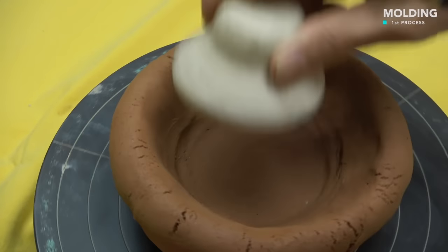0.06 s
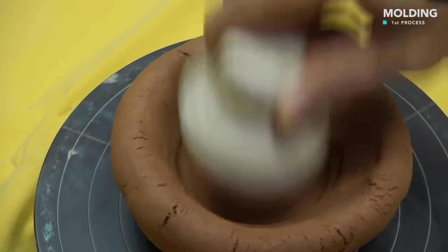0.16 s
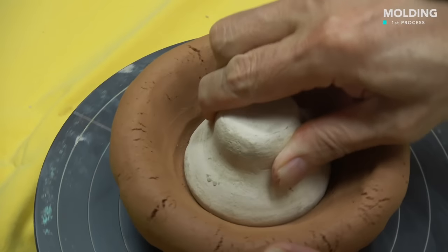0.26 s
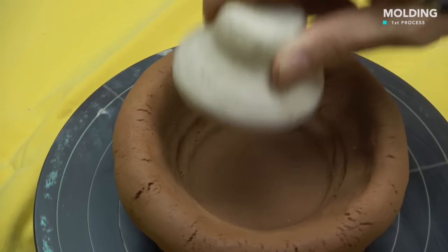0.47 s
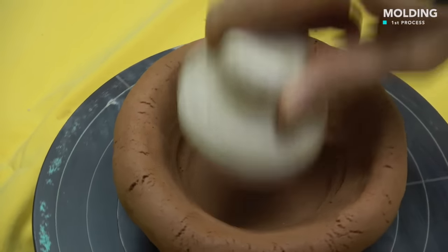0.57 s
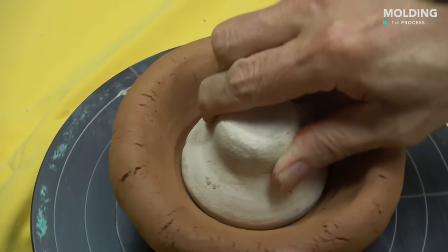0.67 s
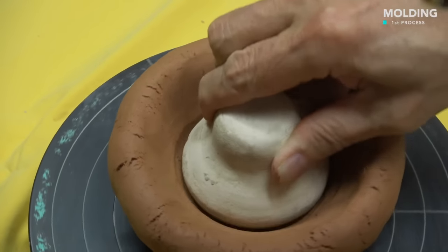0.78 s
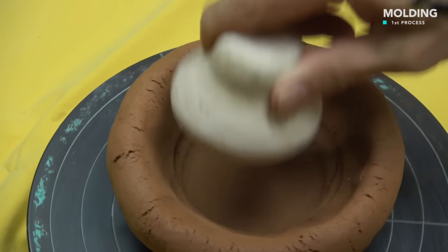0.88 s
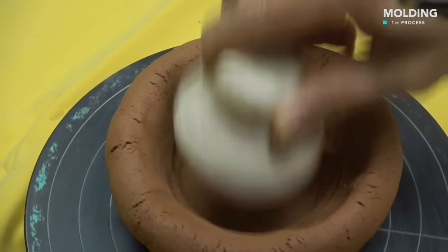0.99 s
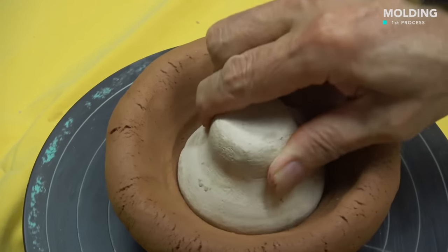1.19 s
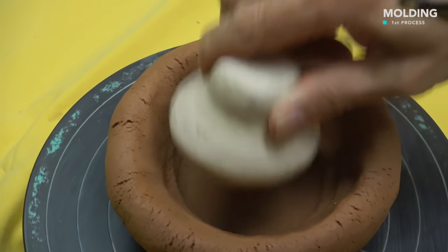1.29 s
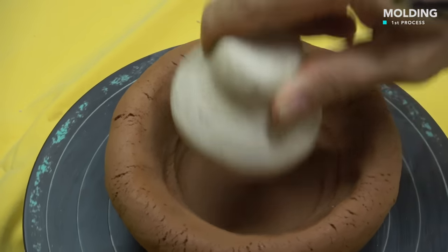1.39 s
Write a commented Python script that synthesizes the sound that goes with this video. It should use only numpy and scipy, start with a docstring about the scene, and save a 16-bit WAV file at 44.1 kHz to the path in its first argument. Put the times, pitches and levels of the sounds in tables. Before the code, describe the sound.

Three short, dull taps of a rounded plaster tool pressing into a soft clay bowl, evenly spaced, with faint sticky ticks as it lifts between them; close microphone, small hard-walled workshop, low quiet room hum.

```python
"""Tapping a soft clay bowl

A rounded plaster tool is tapped into a soft clay bowl on a turntable in a hard-walled workshop.
Each tap is a puff of noise before contact, a slap of noisy contacts and impulses ringing broad resonances.
The tool ticks faintly as it unsticks: short bursts of bright noise. One near echo is a delayed copy;
the room answers with decaying noise bands and low sine modes. A low, slightly flickering noise lies under it."""
import sys
import numpy as np
from scipy import signal
from scipy.fft import rfft, irfft, next_fast_len
from scipy.io import wavfile

SR = 44100
rng = np.random.default_rng(int(sys.argv[2]) if len(sys.argv) > 2 else 0)


def to_wav(s):
    """Save 16-bit WAV."""
    ch = np.atleast_2d(s).T  # columns
    pcm = np.round(np.clip(ch, -1, 1) * 32767)  # PCM
    wavfile.write(sys.argv[1], SR, pcm.astype(np.int16))


def nominal_scale(level):
    """Amplitude ratio for a level in decibels (scalar or array-like)."""
    x = np.asarray(level, float) / 20
    return 10 ** x


N = 63945
LEAD = SR // 4   # samples rendered ahead of the start, so an earlier tap can still ring
BAND_EDGES_HZ = 33 * 2 ** np.arange(0, 9.3, .5)   # half octaves

# broad resonances of bench, bowl and tool, each passed twice: [f/Hz, width of one pass/Hz]
BODY_RESONANCES = [(130, 173), (350, 238), (900, 440), (1500, 730), (2230, 490), (2900, 1140), (4200, 1750),
                   (6300, 2230), (9800, 4500), (14000, 1700)]
# taps: [t/s, slap length/s, puff level/dB, then the strike level/dB of each resonance in turn]
TAPS = [(-.19, .001, -40, 18, 30.9, 11.5, 9.5, 8.5, 18, 17.3, 16, 9, -1),
        (0.2338, 0.0013, -40, 19.5, 27.7, 13.4, 16.5, 16.5, 9.3, 4.8, 7.3, 4.9, -0.98),
        (0.6608, 0.00099, -51, 19.2, 21.5, 7.3, 5.5, 3, 3.1, 7.6, 2.66, 6.2, 0.29),
        (1.0752, 0.00054, -39.5, 16, 17.3, 2.2, 8, 20, 3.8, 2.8, 11.6, 1, -3.1)]
# the tool unsticks from the clay: [t/s, level ahead of the filter/dB, decay/s]
UNSTICKING = [(0.051, -35.5, 0.0012), (.155, -52, 0.034), (0.523, -47, 0.0089), (0.995, -47.5, 0.0022),
              (1.23, -46, 0.0039)]
# room answer by band: [f/Hz, level/dB, t60/s, slower tail relative to that level/dB]
ROOM_BANDS = [(60, -17, 0.61, -16), (143, -21, 0.53, -17), (237, -31.5, 0.47, -15), (367, -23, 0.3, -22.5),
              (565, -28.5, 0.51, -31.5), (926, -24.5, 0.47, -27.5), (2560, -30, 0.44, -38),
              (5400, -33, 0.39, -42), (9500, -36.5, 0.37, -43), (13200, -43, 0.23, -45),
              (16500, -26, 0.43, -45)]
# low modes of bench and room: [f/Hz, level/dB, t60/s]
LOW_MODES = [(62.5, -39.5, 0.31), (118.6, -45, 0.18), (143.2, -42, 0.32), (170.6, -51, 0.67),
             (292.5, -52.5, 0.3), (323.9, -46, 0.31), (372.3, -47, 0.27), (410.2, -49, 0.32),
             (464.2, -50, 0.32), (523.3, -54.5, .35)]
# room sound that the ports do not share: [f/Hz, level relative to the shared part/dB]
UNSHARED_ROOM = [(100, -28), (2000, -42), (5000, -18), (9000, -2), (14000, -38)]
# colour of the room noise, relative: [f/Hz, level per Hz/dB]
FLOOR_COLOUR = [(18, -36), (30, -9), (86, 1.5), (345, -11.5), (702, -10.5), (780, -18.5), (1220, -25.5),
                (1720, -28), (2610, -32), (8080, -45), (16000, -48)]
# level balance of the ports: [f/Hz, left minus right level/dB]
PORT_BALANCE = [(60, -3.5), (110, -5), (200, -7), (380, -0.5), (700, 2.5), (1290, -5.5), (2380, -4.5),
                (4400, -2.5), (8120, 0.5), (15000, -0.5)]
# phase between the ports: [f/Hz, left lead/radians]
PORT_PHASE = [(60, 0.05), (300, 0.059), (700, 0.27), (2000, 0.05), (5000, 0.14), (7000, .4), (10000, 0.42),
              (15000, 0.24)]

SLAP_GRIT = 1       # the faces meet in a dying spray of tiny contacts
PUFF_S, PUFF_SWELL = 0.018, 1.4   # air squeezed out ahead of contact: length, exponent of its rise
PUFF_LOW_HZ, PUFF_HIGH_HZ = 500, 4750
# edge of the first contact, heard only from close by
CRACK_DB, CRACK_LOW_HZ, CRACK_HIGH_HZ = 2.5, 870, 5700
TICK_LOW_HZ, TICK_HIGH_HZ = 3000, 12000
ECHO_DB, ECHO_DELAY_S = -10, .0072   # nearest hard surface
EARLY_DB = -11.5      # scatter off the bench before the walls answer
ROOM_START_S, ROOM_RISE_S, ROOM_HOLD_S, ROOM_KNEE_S = 0.003, 0.0061, 0.025, 0.011
LATE_T60_S = 0.94       # a weaker, slower tail from farther off
FLOOR_DB, FLICKER_DB, FLICKER_HZ = -42, 1.0, 5.2   # total rms, rms swing per band, corner of its smoothing
HISS_DB, HISS_CUT_HZ = -66.5, 12500   # level ahead of the low-pass


def rms_one(x):
    """Scale to rms 1."""
    return x / np.sqrt(np.mean(x ** 2) + 1e-20)


def at_hz(table, hz, column=1):
    """Read a table along log frequency."""
    points = np.array(table)
    return np.interp(np.log(hz + 1e-9), np.log(points[:, 0]), points[:, column])


def convolve(a, b):
    """Convolution cut to the length of a."""
    size = next_fast_len(len(a) + len(b))
    return irfft(rfft(a, size) * rfft(b, size), size)[:len(a)]


def bandpass(x, low_hz, high_hz, order):
    """Butterworth band-pass."""
    return signal.sosfilt(signal.butter(order, [low_hz, high_hz], "band", fs=SR, output="sos"), x)


def lead_time():
    """Clock in seconds, running from the lead-in to the end."""
    return np.arange(N + LEAD) / SR - LEAD / SR


def bands(size):
    """Half-octave noise bands with their centres; neighbours are unrelated."""
    settle = 4000   # samples dropped while the filters settle
    white = rng.standard_normal((2, size + settle))
    for k, (low, high) in enumerate(zip(BAND_EDGES_HZ, BAND_EDGES_HZ[1:])):
        yield np.sqrt(low * high), bandpass(white[k % 2], low, high, 2)[settle:]


def drift(rate_hz):
    """Slow random wander of rms 1: noise through two equal poles, drawn every 40 samples."""
    pole = np.exp(-2 * np.pi * rate_hz * 40 / SR)
    noise = rng.standard_normal(N // 40 + 2002)
    slow = signal.lfilter([1], [1, -2 * pole, pole * pole], noise)[2000:]
    return np.interp(np.arange(N) / 40, np.arange(len(slow)), rms_one(slow))


def ring(x, hz, width_hz):
    """A broad resonance: the same two-pole band-pass run twice."""
    r = np.exp(-np.pi * width_hz / SR)
    b = (1 - r * r) / 2 * np.array([1, 0, -1])
    a = [1, -2 * r * np.cos(2 * np.pi * hz / SR), r * r]
    return signal.lfilter(b, a, signal.lfilter(b, a, x))


def taps():
    """First contact, spray and puff ring the resonances; toward the walls the spray blurs into one clean blow."""
    t = lead_time()
    near, far = 0, 0
    noise, air = rng.standard_normal((2, N + LEAD))
    air = bandpass(air, PUFF_LOW_HZ, PUFF_HIGH_HZ, 3)
    for s, slap_s, puff_db, *struck_db in TAPS:
        since = t - s
        start = int(round(s * SR)) + LEAD
        slap = SLAP_GRIT * noise * (since > 0) * np.exp(-(since / slap_s) ** 2) + 1e-18
        slap[start] = 1
        slap /= np.sqrt(np.sum(slap ** 2))   # unit energy, like the blow
        swell = (since < 0) * np.clip(1 + since / PUFF_S, 0, 1) ** PUFF_SWELL
        puff = nominal_scale(puff_db) * air * swell
        blow = np.zeros(N + LEAD) + 1e-18
        blow[start] = 1
        near = near + nominal_scale(CRACK_DB) * bandpass(blow, CRACK_LOW_HZ, CRACK_HIGH_HZ, 1)
        for k, ((hz, width_hz), db) in enumerate(zip(BODY_RESONANCES, struck_db)):
            hit = slap if k > 3 else blow   # the four lowest take the clean blow
            # polarity alternates from one resonance to the next
            rung = (-1) ** k * nominal_scale(db) * ring([puff + hit, blow], hz, width_hz)
            near, far = near + rung[0], far + rung[1]
    return np.array([near, far])


def ticks():
    """Unsticking as short bright crackles: filtered noise with instant starts and exponential decays."""
    t = lead_time()
    shape = sum(nominal_scale(db) * (t > s) * np.exp(-np.abs(t - s) / decay_s) for s, db, decay_s in UNSTICKING)
    return bandpass(shape * rng.standard_normal(N + LEAD), TICK_LOW_HZ, TICK_HIGH_HZ, 2)


def room(near, far):
    """Direct sound, one echo, low modes and dense reflections that build, hold and die by band; mid and side."""
    t = np.arange(SR) / SR
    scatter = nominal_scale(EARLY_DB) * (t > .001)
    rise = scatter + 1 - np.exp(-np.maximum(t - ROOM_START_S, 0) / ROOM_RISE_S)
    # decay clock: bends softly from standing still to running
    fading = ROOM_KNEE_S * np.logaddexp(0, (t - ROOM_HOLD_S) / ROOM_KNEE_S)
    mid, side = np.zeros((2, SR))
    for (hz, shared), (_, unshared) in zip(bands(SR), bands(SR)):
        main_tail = nominal_scale(-60 * fading / at_hz(ROOM_BANDS, hz, column=2))
        late_tail = nominal_scale(at_hz(ROOM_BANDS, hz, column=3) - 60 * t / LATE_T60_S)
        shape = nominal_scale(at_hz(ROOM_BANDS, hz)) * rise * (main_tail + late_tail)
        mid += shape * shared
        side += nominal_scale(at_hz(UNSHARED_ROOM, hz)) * shape * unshared
    for hz, db, t60 in LOW_MODES:
        mid += rise * nominal_scale(db - 60 * fading / t60) * np.sin(2 * np.pi * hz * t)
    echo = nominal_scale(ECHO_DB) * np.roll(near, int(ECHO_DELAY_S * SR))
    return near + echo + convolve(far, mid), convolve(far, side)


def floor():
    """Low room noise, built from noise bands whose levels flicker a little."""
    noise = 0
    for hz, band in bands(N):
        noise = noise + nominal_scale(at_hz(FLOOR_COLOUR, hz) + FLICKER_DB * drift(FLICKER_HZ)) * band
    return nominal_scale(FLOOR_DB) * rms_one(noise)


def scene():
    """Everything reaches two close microphone ports almost alike."""
    near, far = taps() + ticks()
    mid, side = room(near, far)
    mid = mid[LEAD:] + floor()
    side = side[LEAD:]
    return np.array([mid + side, mid - side])


def roll_off(x):
    """The treble ends steeply here."""
    return signal.sosfilt(signal.butter(12, 16850, fs=SR, output="sos"), x)


def record(dry):
    """The ports differ in level and phase by band and hiss faintly."""
    size = next_fast_len(N + 8192)
    hz = np.arange(size // 2 + 1) * SR / size
    # half the difference goes to each port, in opposite directions
    tilt = nominal_scale(at_hz(PORT_BALANCE, hz) / 2) * np.exp(.5j * at_hz(PORT_PHASE, hz))
    pair = irfft(rfft(dry, size) * np.array([tilt, 1 / tilt]), size)[:, :N]
    low_pass = signal.butter(4, HISS_CUT_HZ, fs=SR, output="sos")
    hiss = signal.sosfilt(low_pass, rng.standard_normal((2, N)))
    mix = pair + nominal_scale(HISS_DB) * hiss
    return roll_off(mix)


dry = scene()
out = record(dry)
to_wav(out)
```